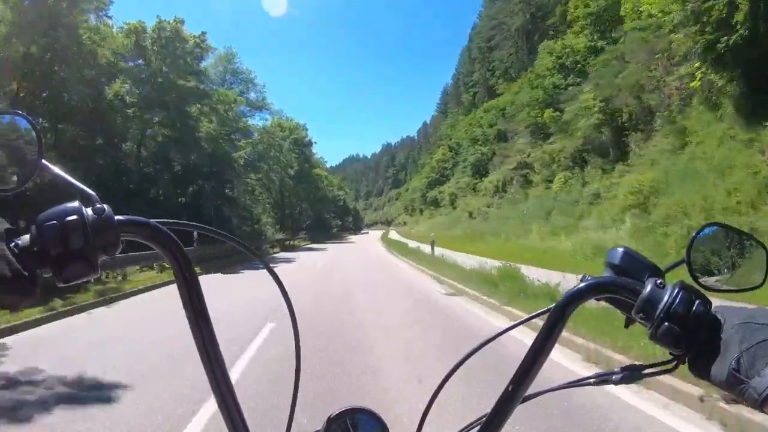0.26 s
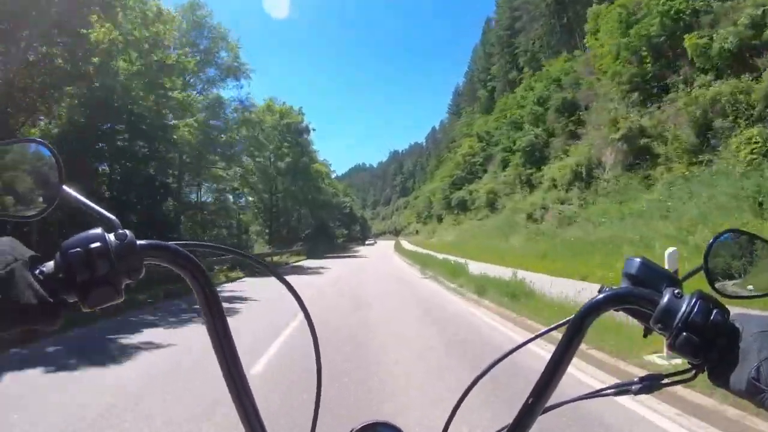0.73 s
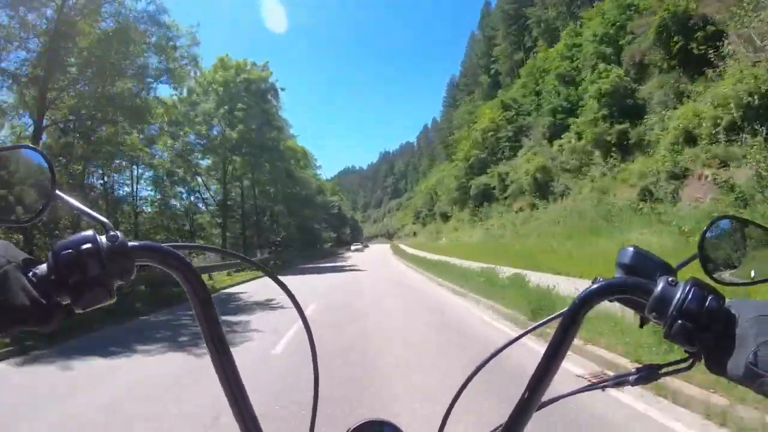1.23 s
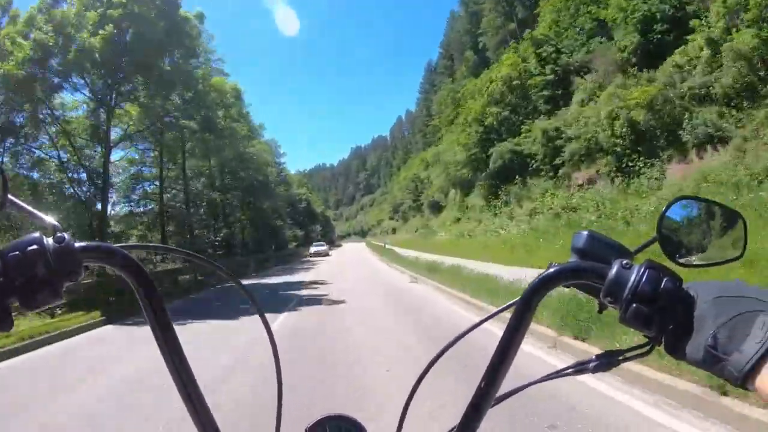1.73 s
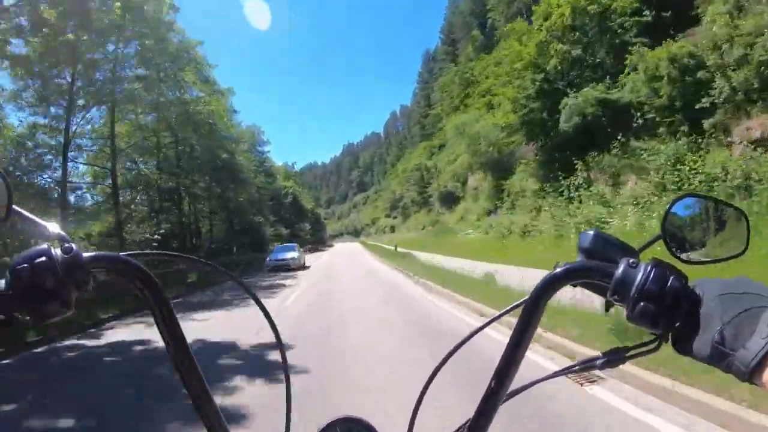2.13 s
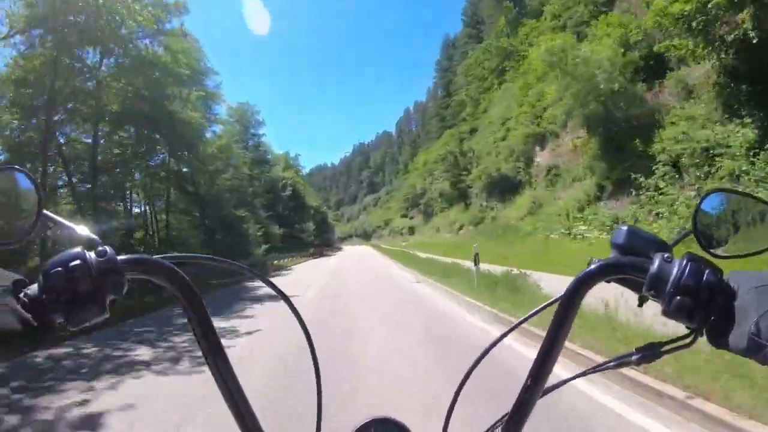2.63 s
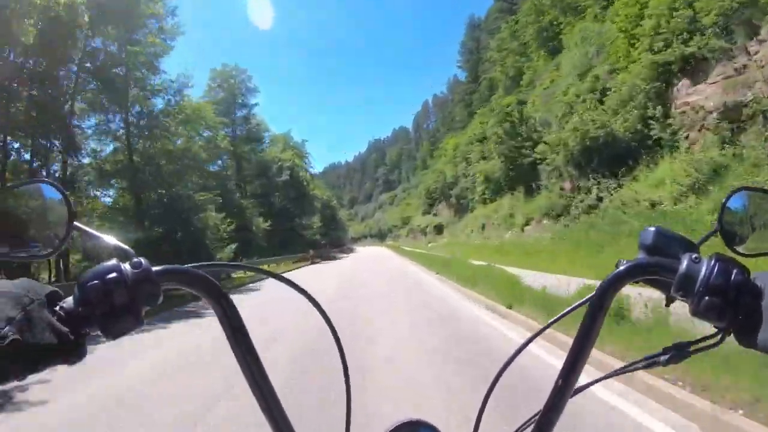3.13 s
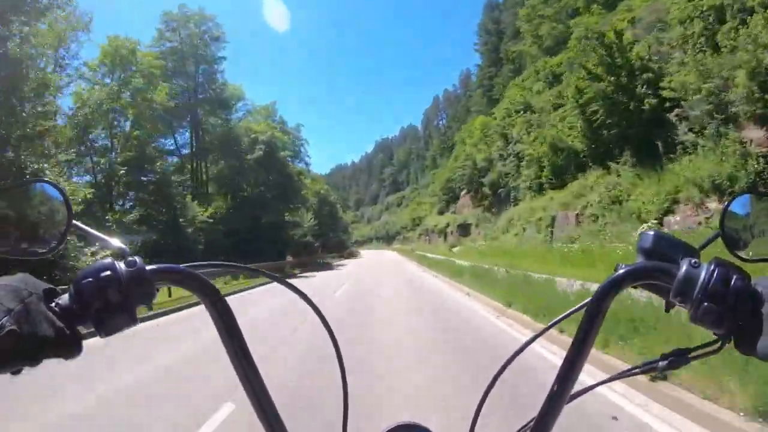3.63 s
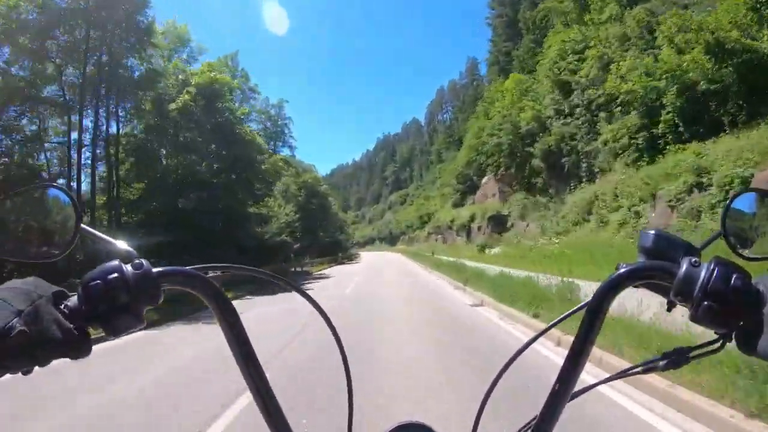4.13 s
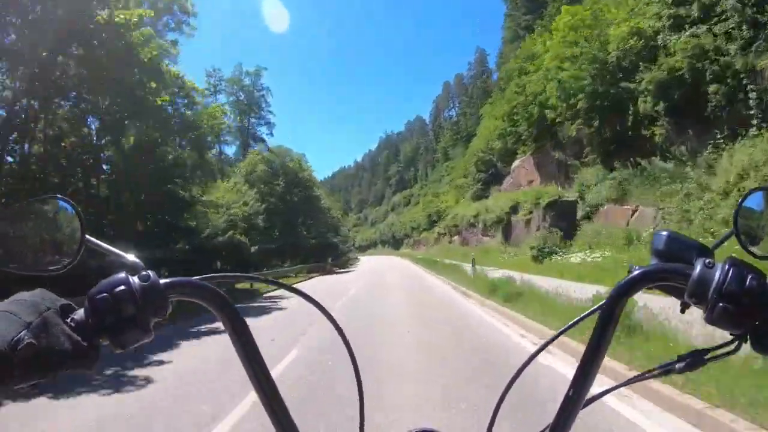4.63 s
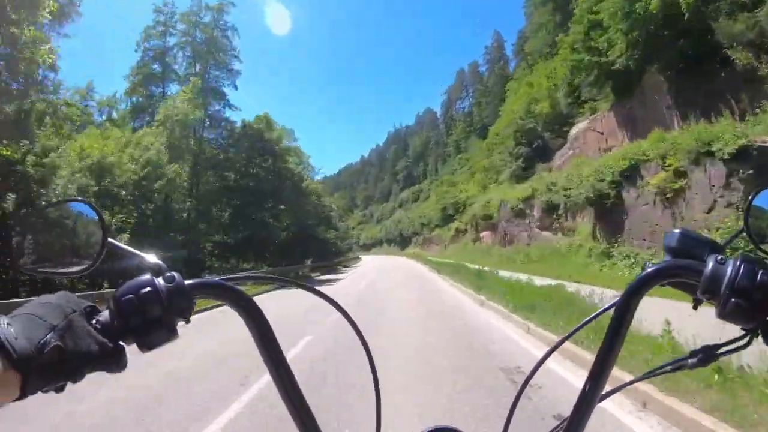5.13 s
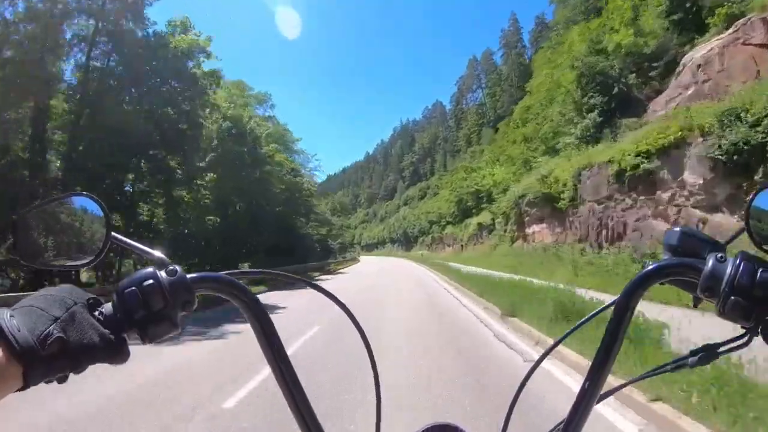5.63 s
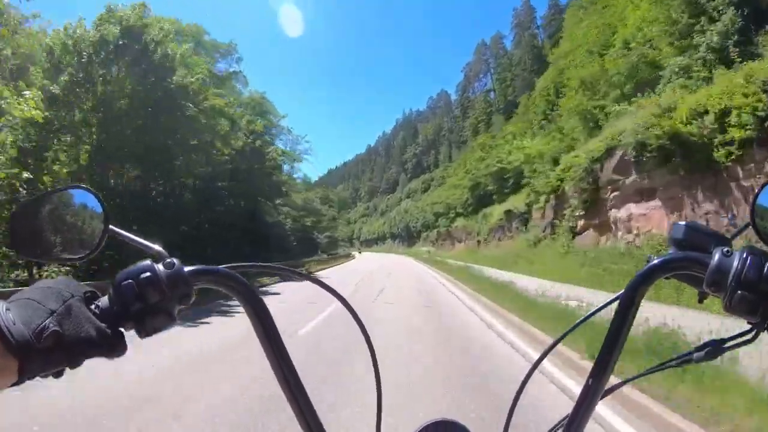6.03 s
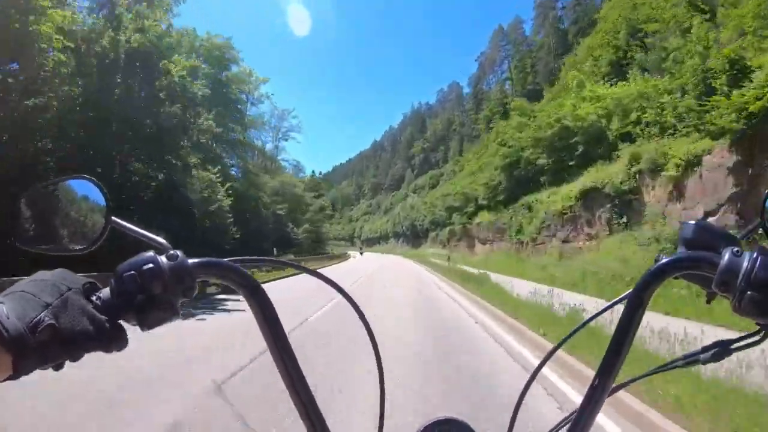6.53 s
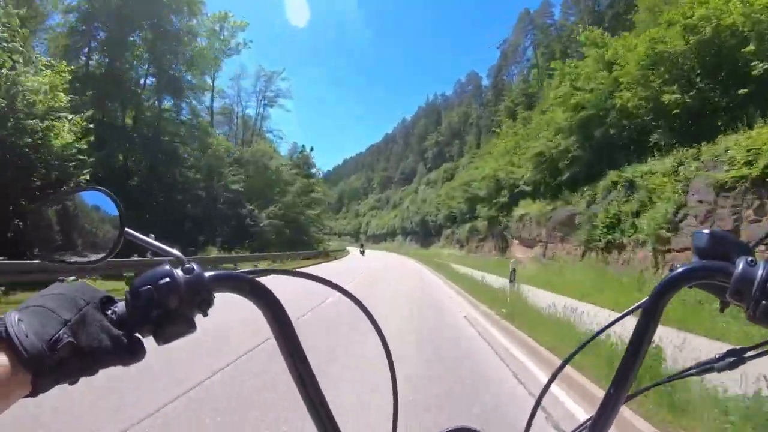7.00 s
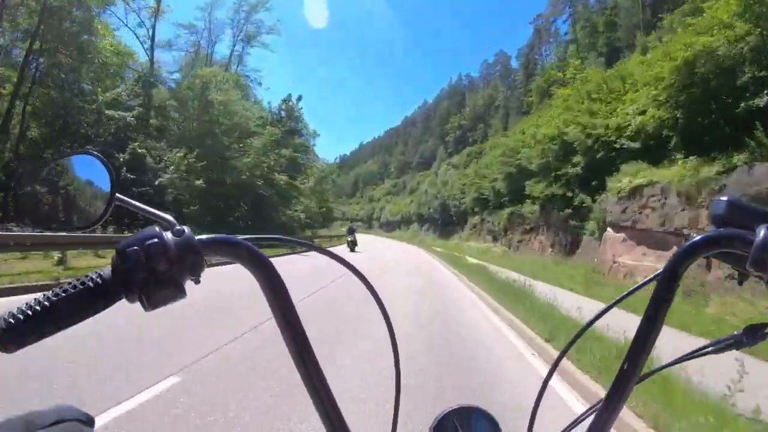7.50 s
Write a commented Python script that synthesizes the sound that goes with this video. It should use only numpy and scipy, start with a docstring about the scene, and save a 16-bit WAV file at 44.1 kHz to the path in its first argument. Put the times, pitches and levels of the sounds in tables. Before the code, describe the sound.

Heard from the rider's seat, an uneven engine throb and valve clatter run under buffeting wind; a car whooshes by before the engine eases off.

```python
"""A V-twin motorcycle cruises on a country road, heard on the rider: firing pulses ring the pipes in an
uneven two-pulse throb, valve knocks ring case and fins, the intake hisses once a cycle, tyres hiss.
Wind noise rumbles and rushes; short noise bursts make jets and gusts, pressure swings make dry slaps.
A car's roar swells past at 2.6 s. Near 6 s the throttle shuts: firing scatters into a burble and the
pipes turn to their coasting colour, while a sine thrums; weak random slaps follow to the end."""
import sys
import numpy as np
from scipy import signal
from scipy.fft import rfft, irfft, next_fast_len
from scipy.io import wavfile
from scipy.ndimage import uniform_filter1d, minimum_filter1d, map_coordinates

SR = 44100
rng = np.random.default_rng(int(sys.argv[2]) if len(sys.argv) > 2 else 0)


def dump_mix(stems):
    """Bounce the given channels to the path in sys.argv[1] as a 16-bit WAV at rate SR."""
    frames = np.atleast_2d(stems).T  # one column per channel
    limited = np.clip(frames, -1, 1)  # hard clip at full scale
    pcm = np.round(limited * 32767).astype(np.int16)
    wavfile.write(sys.argv[1], SR, pcm)


N = 342216


def amp(db):
    """Decibels to gain."""
    return 10 ** (np.asarray(db) / 20)


def unit(x):
    """Scale to rms 1."""
    return x / np.sqrt(np.mean(x ** 2) + 1e-20)


def curve(rows):
    """(time_s, value) rows as one value per sample."""
    return np.interp(np.arange(N) / SR, *np.transpose(rows))


def wobble(rate_hz):
    """Smooth random curve with rate_hz knots a second."""
    knots = rng.standard_normal(int(N * rate_hz / SR) + 4)
    return map_coordinates(knots, [np.arange(N) * rate_hz / SR])


def noise():
    """Fresh white noise."""
    return rng.standard_normal(N)


def filtered(x, response):
    """x times a complex response of frequency."""
    size = 2 * next_fast_len(N // 2 + SR // 4)
    return irfft(rfft(x, size) * response(np.fft.rfftfreq(size, 1 / SR)), size)[:N]


def coloured(x, points):
    """x through a minimum-phase filter drawn through (freq_hz, db) points, at rms 1."""
    def response(hz):
        freq_hz, db = np.transpose(points)
        magnitude = amp(np.interp(np.log(hz + 1), np.log(freq_hz), db))
        cepstrum = irfft(np.log(magnitude))
        half = len(cepstrum) // 2
        # folding the cepstrum forward makes the filter causal
        folded = 2 * cepstrum[:half] * np.r_[.5, np.ones(half - 1)]
        return np.exp(rfft(folded, len(cepstrum)))
    return unit(filtered(x, response))


def resonance(hz, centre_hz, width_hz):
    """Response of one damped mode."""
    return 1j * hz * width_hz / (centre_hz ** 2 - hz ** 2 + 1j * hz * width_hz)


def tone(pitch_hz, wander_hz, rate_hz):
    """Sine of rms 1 with a randomly wandering pitch."""
    pitch = pitch_hz + wander_hz * wobble(rate_hz)
    return unit(np.sin(2 * np.pi * np.cumsum(pitch) / SR))


def pulse_shape(length, rise_s):
    """Pulse that peaks at 1 after rise_s, then decays."""
    age = np.arange(length) / SR / rise_s
    return age * np.exp(1 - age)


# shut-throttle running: time_s, share_0_1
OVERRUN = [(6, 0), (6.15, 1), (6.42, 1), (6.56, .1), (7.76, .2)]
# pipes and silencers under power: freq_hz, gain_db
PIPE = [(20, -29.5), (68, -22.5), (88, -3.5), (113, -4.5), (136, 1.5), (159, -6), (200, -3), (250, -24),
        (293, -10.5), (320, -24), (363, -21), (450, -31.5), (800, -48), (4000, -120)]
# pipes and silencers when coasting: freq_hz, gain_db
PIPE_COASTING = [(20, -28.5), (64, -9.5), (86, -2), (109, -2), (130, 0.5), (153, -8.5), (196, -1.5),
                 (240, -17.5), (282, -15.5), (310, -20.5), (350, -26), (450, -30.5), (800, -54),
                 (4000, -120)]
# gas puff colour: freq_hz, density_db_per_hz
PUFF = [(120, -24.5), (230, 0), (310, 1), (430, -7), (560, -20.5), (1000, -37.5), (3000, -78.5)]
BANK_LAG_CYCLES = 315 / 720  # rear cylinder after front
BURBLE_DB, BURBLE_S = 2.5, .0016  # extra pulse scatter at full overrun
COAST_FROM_S, COAST_TO_S = 5.8, 6.36
EXHAUST_DB, PUFF_DB, PUFF_RISE_S = -15, -31.5, .003  # levels at cruising load


def exhaust(cycle, load_db, rear_db, scatter_db, jitter_s, chamber_hz, chamber_width_hz):
    """Two cylinders fire 315 and 405 crank degrees apart; each pulse rings the pipes and puffs gas."""
    count = np.arange(int(cycle[-1]) + 1)
    firings = np.column_stack([count, count + BANK_LAG_CYCLES]).ravel()
    chance = rng.standard_normal((len(firings), 2))
    overrun = np.interp(firings, cycle, curve(OVERRUN))
    # firings outside the scene land past its end
    at = np.interp(firings, cycle, np.arange(N), left=2 * N, right=2 * N)
    at += (jitter_s + BURBLE_S * overrun) * SR * chance[:, 0]
    size_db = np.tile([0, rear_db], len(count)) + (scatter_db + BURBLE_DB * overrun) * chance[:, 1]
    pulses = np.bincount(np.abs(at).astype(int), amp(size_db), minlength=N)[:N]

    def chamber(hz):
        # all-pass: delays what is near the silencer's resonance, spreading each pulse
        return 2 * resonance(hz, chamber_hz, chamber_width_hz) - 1
    spread = filtered(pulses - pulses.mean(), chamber)
    coasting = curve([(COAST_FROM_S, 0), (COAST_TO_S, 1)])
    throb = (1 - coasting) * coloured(spread, PIPE) + coasting * coloured(spread, PIPE_COASTING)
    flow = signal.fftconvolve(pulses, pulse_shape(SR // 30, PUFF_RISE_S))[:N]
    puffs = coloured(flow * noise(), PUFF)
    return amp(load_db) * (amp(EXHAUST_DB) * throb + amp(PUFF_DB) * puffs)


# valve knocks in each cycle: phase_cycles, level_db
VALVES = [(.11, -0.5), (.23, -2.5), (0.359, -4), (.5, -1), (.75, -13.5), (.86, -5.5), (.98, -2)]
# engine case: freq_hz, density_db_per_hz
CASE = [(700, -19.5), (1100, -1), (1900, -8), (2250, 0), (2600, -9), (3100, -3), (4200, -15.5),
        (5200, -18.5), (6300, -30.5), (9000, -50.5), (14000, -88)]
# cooling fins and covers: pitch_hz, width_hz, level_db
FINS = [(2179, 24, -10.5), (2470, 260, -3.5), (2640, 300, -3.5), (2670, 35, -13), (3010, 40, -17)]
# whirring fin ring: time_s, level_db
FIN_LEVEL = [(0, -49), (.35, -43), (.8, -42), (1.1, -40.5), (1.5, -37.5), (1.9, -42), (2.6, -46.5),
             (3.0, -43), (4.3, -41.5), (5.1, -39.5), (5.6, -45.5), (6.9, -46.5), (7.76, -47.5)]
# one clear fin tone: time_s, level_db
SINGING_LEVEL = [(0, -54), (.6, -51), (1.15, -41.5), (1.6, -45.5), (2.1, -52), (2.9, -53.5), (3.3, -49),
                 (5.1, -46), (5.6, -51), (7.76, -54.5)]
VALVE_RISE_S, VALVE_JITTER_S, VALVE_SCATTER_DB = .0007, .0003, 1.6
CLATTER_DB, CLATTER_DB_PER_LOAD_DB = -40.5, 0.38  # case level at cruising load, its growth
SINGING_HZ, SINGING_WANDER_HZ, SINGING_FLICKER_DB = 2359, 12, 2.5


def valve_gear(cycle, load_db, chain_db, grain_db):
    """Valves knock in a fixed pattern over the chain's steady rattle; case and fins ring with them."""
    phase, db = np.transpose(VALVES)
    turns = np.arange(-1, int(cycle[-1]) + 1)
    events = (turns[:, None] + phase).ravel()
    at = np.interp(events, cycle, np.arange(N), left=2 * N, right=2 * N)
    chance = rng.standard_normal((len(at), 2))
    at += VALVE_JITTER_S * SR * chance[:, 0]
    size = amp(np.tile(db, len(turns)) + VALVE_SCATTER_DB * chance[:, 1])
    impulses = np.bincount(np.abs(at).astype(int), size, minlength=N)[:N]
    knocks = signal.fftconvolve(impulses, pulse_shape(SR // 50, VALVE_RISE_S))[:N]
    chain = amp(chain_db + grain_db * wobble(350))
    shake = np.hypot(knocks, chain)

    def ring(centre_hz, width_hz):
        return unit(filtered(shake * noise(), lambda hz: resonance(hz, centre_hz, width_hz) ** 2))
    case = amp(CLATTER_DB + CLATTER_DB_PER_LOAD_DB * load_db) * coloured(shake * noise(), CASE)
    rings = sum(amp(level_db) * ring(pitch_hz, width_hz) for pitch_hz, width_hz, level_db in FINS)
    fins = amp(curve(FIN_LEVEL)) * rings
    singing_gain = amp(curve(SINGING_LEVEL) + SINGING_FLICKER_DB * wobble(20))
    singing = singing_gain * tone(SINGING_HZ, SINGING_WANDER_HZ, rate_hz=70)
    return case + fins + singing


# intake hiss colour: freq_hz, density_db_per_hz
INTAKE = [(2000, -15.5), (3700, 3), (5200, -0.5), (6000, 1), (8000, -.5), (9000, -5.5), (9500, -13.5),
          (10700, -12.5), (14000, -46.5)]
# intake hiss: time_s, level_db
INTAKE_LEVEL = [(0, -55), (1.3, -54.5), (2.5, -54.5), (3.2, -53), (4.2, -54.5), (5.1, -54.5), (5.7, -57),
                (6.9, -57.5), (7.76, -55.5)]
GULP_AT_CYCLES, GULP_LENGTH_CYCLES, GULP_DB = .05, .1, 3.7


def intake(cycle):
    """Hiss that swells once a cycle as the engine draws air."""
    offset = (cycle - GULP_AT_CYCLES + .5) % 1 - .5
    gulp = np.exp(-(offset / GULP_LENGTH_CYCLES) ** 2)
    return amp(curve(INTAKE_LEVEL)) * coloured(amp(GULP_DB * gulp) * noise(), INTAKE)


# tyre hiss colour: freq_hz, density_db_per_hz
TYRE_HISS = [(2500, -20), (3600, -2), (4300, -2), (5300, 1), (5900, -14), (9000, -50)]
TYRE_HISS_DB = -57


def tyre_hiss():
    """Steady tyre hiss on the road: coloured noise at a constant level."""
    return amp(TYRE_HISS_DB) * coloured(noise(), TYRE_HISS)


# airstream strength: time_s, rel_usual_db
WIND = [(0, 6), (.45, 2), (.72, -2), (1.1, -2), (1.4, -.5), (1.7, -1), (1.86, 5), (2.15, 3.5), (2.7, 0.5),
        (2.92, -2), (3.4, 1.5), (3.8, -0.5), (5.35, 0), (5.65, -2.5), (6.4, -1), (6.88, -2.5), (7.45, 1),
        (7.75, 8)]
# deep rumble: time_s, level_db
RUMBLE_LEVEL = [(0, -19.5), (2.2, -20.5), (2.9, -19.5), (4.3, -18.5), (5.6, -18.5), (6.25, -20), (7, -22.5),
                (7.76, -20.5)]
# wind colours, deep to high: freq_hz, density_db_per_hz
RUMBLE = [(8, -21), (20, -11), (38, -1), (60, 0), (85, -3.5), (130, -14), (300, -33), (2000, -120)]
EDDIES = [(30, -30), (100, 3), (160, -3.5), (210, -1), (260, -13.5), (330, -15.5), (450, -21.5), (700, -36),
          (5000, -120)]
RUSH = [(100, 6), (300, 6.5), (500, 4), (750, 1), (1150, -1), (1800, -7.5), (2800, -11.5), (4000, -20),
        (5350, -29.5), (5900, -34.5), (8500, -41.5), (13000, -100)]
EDDY_DB, RUSH_DB = -21.5, -30  # at usual airstream strength
EDDY_DB_PER_WIND_DB = 0.45
LUMP_DB, SWELL_RATE_HZ = 2.6, 5  # eddy unevenness, knot rate of the slower eddy swell


def wind(eddy_swell_db, flutter_db, tear_db):
    """Eddies thump over a deep rumble; the rush flutters with them. Both grow with the airstream."""
    strength_db = curve(WIND)
    lumps = wobble(36)
    rumble = amp(curve(RUMBLE_LEVEL)) * coloured(noise(), RUMBLE)
    churn = amp(LUMP_DB * lumps + eddy_swell_db * wobble(SWELL_RATE_HZ))
    eddy_gain = amp(EDDY_DB + EDDY_DB_PER_WIND_DB * strength_db)
    eddies = eddy_gain * unit(churn * coloured(noise(), EDDIES))
    flutter = amp(flutter_db * lumps + tear_db * wobble(260))
    rush = amp(RUSH_DB + strength_db) * unit(flutter * coloured(noise(), RUSH))
    return rumble + eddies + rush


PORT_HZ = 5500  # microphone port passes little wind noise above this
BURST_REACH = 1.2  # a burst fades out above this multiple of its centre


def bursts(rows, level_db, width_share, rough_db, order):
    """Short, ragged bursts of air on the microphone port, each in a band around its own centre."""
    out = np.zeros(N)
    air = noise() * amp(rough_db * wobble(440))
    for centre_s, db, half_s, centre_hz in rows:
        first = max(int((centre_s - 4 * half_s) * SR) - 512, 0)
        last = min(int((centre_s + 4 * half_s) * SR) + 512, N)
        span = np.arange(first, last)
        bell = np.exp(-.5 * ((span / SR - centre_s) / half_s) ** 2)
        hz = np.fft.rfftfreq(len(span), 1 / SR)
        band = resonance(hz, centre_hz, width_share * centre_hz) ** order
        # the smallest eddies carry little energy, and the port cuts what is left
        dull = 1 / (1 + (hz / (BURST_REACH * centre_hz)) ** 2) / (1 + (hz / PORT_HZ) ** 12)
        burst = irfft(rfft(air[span] * bell) * band * dull, len(span))
        out[span] += amp(db + level_db) * unit(burst) * np.sqrt(np.mean(bell ** 2))
    return out


# centre_s, level_db (before the common level_db), half_length_s, centre_hz
JETS = [(.1, -48, 0.074, 3520), (.32, -39, .04, 2000), (.343, -36, .0018, 3000), (1.52, -42, 0.2, 1390),
        (1.881, -27.5, 0.0029, 2350), (1.887, -39, 0.0013, 5000), (1.919, -40.5, 0.0037, 3930),
        (2.025, -43.5, 0.018, 4100), (2.06, -43.5, 0.02, 4700), (5.372, -34.5, .0015, 3000),
        (5.383, -36, .003, 2000), (7.11, -38.5, 0.026, 1820), (7.715, -40, 0.0074, 3000),
        (7.75, -43, 0.027, 3700)]


def jets():
    """Thin jets of air hiss past an edge in a narrow band."""
    return bursts(JETS, level_db=4.0, width_share=0.5, rough_db=3.5, order=2)


# centre_s, level_db (before the common level_db), half_length_s, centre_hz
GUSTS = [(.33, -22, 0.043, 350), (.47, -25.5, 0.05, 480), (.6, -31.5, .05, 750), (1.818, -12.5, 0.018, 288),
         (1.89, -17, 0.016, 230), (2.3, -30, 0.031, 700), (2.75, -23.5, 0.033, 620),
         (2.84, -20.5, 0.0064, 420), (5.27, -17, 0.005, 400), (5.377, -12, 0.0086, 280),
         (5.418, -17.5, 0.0043, 420), (6.62, -21.5, 0.01, 452), (6.878, -22, 0.0047, 358),
         (7.102, -19, 0.012, 650), (7.15, -19, 0.023, 430), (7.195, -21, 0.0037, 550),
         (7.714, -13.5, 0.0063, 720), (7.735, -18, 0.032, 300)]


def gusts():
    """Strong gusts hit the microphone as rough, broad-band bursts."""
    return bursts(GUSTS, level_db=-3.0, width_share=1.2, rough_db=2, order=1)


# single eddies on the port: centre_s, level_db (before the part levels), pitch_hz
SLAPS = [(.343, -12.5, 440), (.434, -18.5, 750), (1.827, -12.5, 340), (1.843, -15, 360), (2.842, -16, 450),
         (5.133, -19.5, 400), (5.271, -16, 480), (5.323, -17.5, 420), (5.372, -12, 480), (5.383, -10, 400),
         (5.412, -15, 450), (5.422, -16.5, 520), (6.23, -20.5, 850), (6.347, -15.5, 420), (6.41, -19, 520),
         (6.579, -22, 600), (6.877, -16.5, 340), (6.945, -9.5, 560), (7.096, -16, 700), (7.161, -13.5, 480),
         (7.192, -15, 550), (7.371, -16, 560), (7.416, -15.5, 800), (7.477, -23, 700), (7.568, -19, 550),
         (7.606, -20, 600), (7.719, -14, 600)]
# crack colour: freq_hz, density_db_per_hz
CRACK = [(150, -10), (450, 0), (1000, -.5), (1700, -5), (2200, -13), (3300, -19), (4300, -36), (7000, -62)]
PUSH_DB = -2  # relative to the slap
THUMP_DB, THUMP_SHARE = -1, .45  # relative to the push: level, pitch
CRACK_DB, CRACK_RISE_S = -10.5, .0011  # level relative to the slap


def slaps(rows):
    """Dry knocks: one push and pull of pressure over a slower thump, with a short crack on top."""
    out = np.zeros(N + SR)
    t = np.arange(-SR // 200, SR // 80) / SR
    age = np.maximum(t / CRACK_RISE_S + 1, 0)
    fade = amp(CRACK_DB) * age * np.exp(1 - age)
    crack = coloured(noise(), CRACK)

    def swing(hz):
        phase = 2 * np.pi * hz * t
        return phase * np.exp(.5 - .5 * phase ** 2)
    for centre_s, level_db, pitch_hz in rows:
        start = int((centre_s + t[0]) * SR)
        push = swing(pitch_hz) + amp(THUMP_DB) * swing(THUMP_SHARE * pitch_hz)
        snap = fade * np.roll(crack, -start)[:len(t)]
        out[start:start + len(t)] += amp(level_db) * (amp(PUSH_DB) * push + snap)
    return out[:N]


# roar of bow wave and wake: freq_hz, density_db_per_hz
CAR = [(150, -12.5), (400, 3), (700, -1), (1100, -3), (1600, -12), (3000, -24), (8000, -67)]
CAR_AT_S, CAR_HALF_S, CAR_DB = 2.58, .2, -33


def oncoming_car():
    """Bow wave and wake of a car in the other lane: soft noise swells and fades."""
    swell = np.exp(-.5 * ((np.arange(N) / SR - CAR_AT_S) / CAR_HALF_S) ** 2)
    return amp(CAR_DB) * swell * coloured(noise(), CAR)


# regular vortices: time_s, level_db
THRUM_LEVEL = [(5.85, -69), (6.03, -22), (6.3, -22), (6.55, -20), (6.68, -34), (6.85, -72)]
THRUM_HZ, THRUM_WANDER_HZ = 38.5, 1.2


def thrum():
    """Air briefly sheds regular vortices: a deep, nearly steady sine."""
    return amp(curve(THRUM_LEVEL)) * tone(THRUM_HZ, THRUM_WANDER_HZ, rate_hz=10)


WEAK_FROM_S, WEAK_RATE_HZ = 6.4, 5.3  # rate: inverse of the median gap
WEAK_DB, WEAK_HZ = -32, 460  # typical slap level and pitch


def weak_slaps(scatter_db, pitch_spread):
    """Rows for slaps(): weak, randomly spaced slaps until the end."""
    chance = rng.standard_normal((64, 3))
    times_s = WEAK_FROM_S + np.cumsum(np.exp(.5 * chance[:, 0]) / WEAK_RATE_HZ)
    return [(s, WEAK_DB + scatter_db * loud, WEAK_HZ * np.exp(pitch_spread * high))
            for s, (_, loud, high) in zip(times_s, chance) if s < N / SR]


# four-stroke engine speed: time_s, cycles_per_s
SPEED = [(0, 22.03), (1, 22.28), (2, 22.56), (3, 22.7), (4.5, 22.75), (5.5, 22.59), (6, 22.39),
         (6.5, 22.09), (7, 21.7), (7.76, 21.58)]
# engine load: time_s, rel_cruising_db
THROTTLE = [(0, -2), (.6, -2), (1.1, 1), (1.9, 0.5), (2.3, 1), (2.85, -3.5), (3.3, -.3), (4.3, 1.5),
            (5.15, 0.6), (5.6, -4.5), (5.98, 0.5), (6.25, -4.5), (6.6, -2), (6.95, -7.5), (7.3, -1.5),
            (7.76, -5.5)]
START_CYCLES = .53  # engine phase at the start


def scene():
    """Engine, tyres, wind and passing car summed at the microphone."""
    cycle = START_CYCLES + np.cumsum(curve(SPEED)) / SR
    load_db = curve(THROTTLE)
    pipes = exhaust(cycle, load_db, rear_db=-1.15, scatter_db=0.47, jitter_s=.0001,
                    chamber_hz=106.7, chamber_width_hz=137)
    engine = pipes + valve_gear(cycle, load_db, chain_db=-6, grain_db=1.0) + intake(cycle)
    air = wind(eddy_swell_db=0.85, flutter_db=1.0, tear_db=1.37) + jets() + gusts()
    knocks = slaps(SLAPS + weak_slaps(scatter_db=2.5, pitch_spread=0.28))
    return (engine + tyre_hiss() + air + knocks + oncoming_car() + thrum())[None]


TOP_HZ = 15400  # nothing passes above this


def record(dry, drive_db=2, ceiling=0.53, hold_s=0.031):
    """A limiter holds down the boosted bass; the treble fades out below the band limit."""
    bass = filtered(dry[0], lambda hz: 1 / (1 + (hz / 380) ** 4))
    driven = amp(drive_db) * bass
    needed = (1 + np.abs(driven / ceiling) ** 6) ** (-1 / 6)
    span = max(int(hold_s * SR), 1)
    gain = uniform_filter1d(minimum_filter1d(needed, span), span)
    limited = gain * driven + (dry[0] - bass)
    return filtered(limited, lambda hz: (hz < TOP_HZ) / (1 + (hz / 12500) ** 20))[None]


dry = scene()
out = record(dry)
dump_mix(out)
```